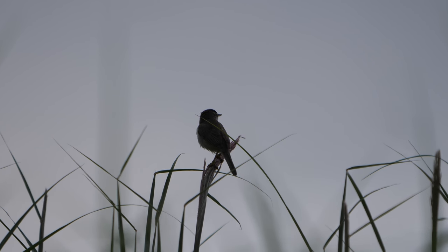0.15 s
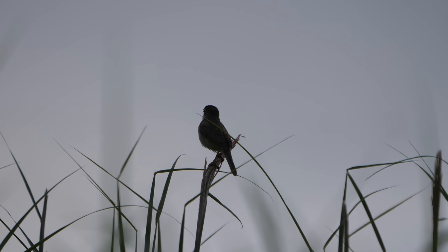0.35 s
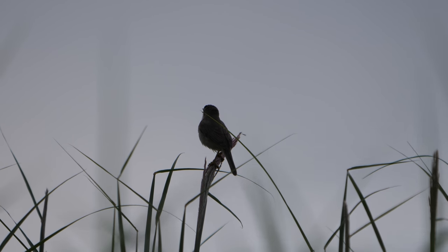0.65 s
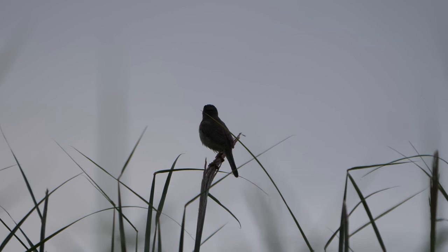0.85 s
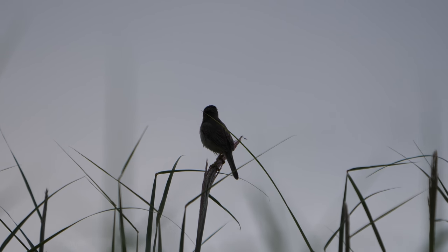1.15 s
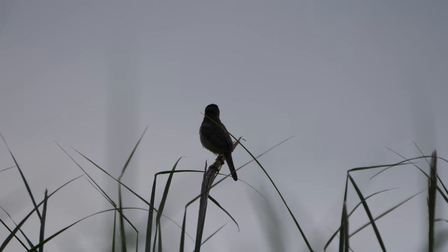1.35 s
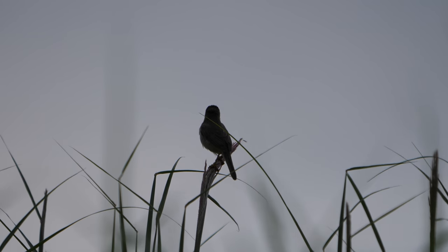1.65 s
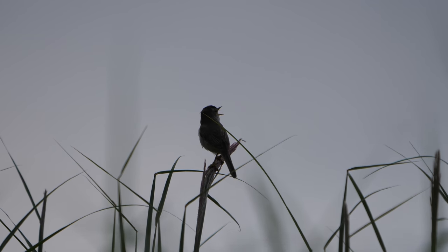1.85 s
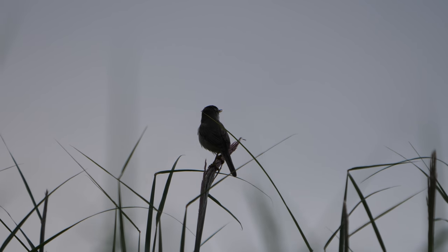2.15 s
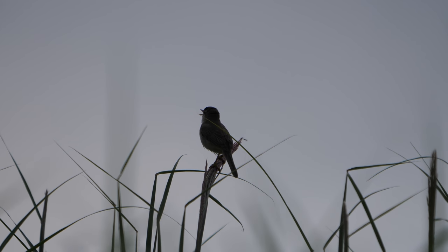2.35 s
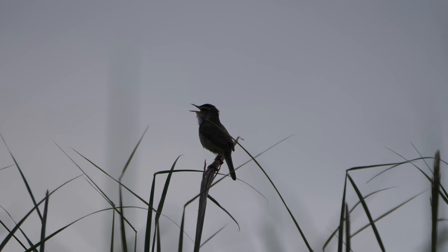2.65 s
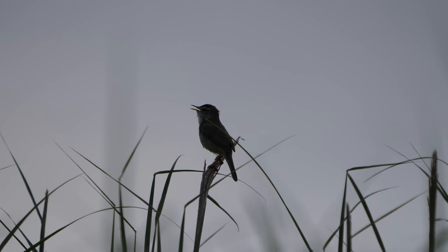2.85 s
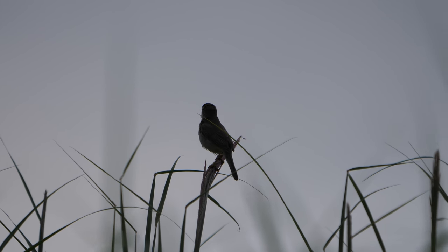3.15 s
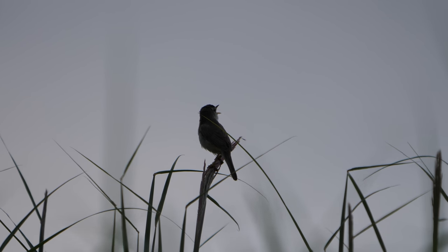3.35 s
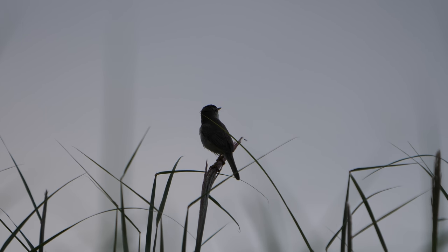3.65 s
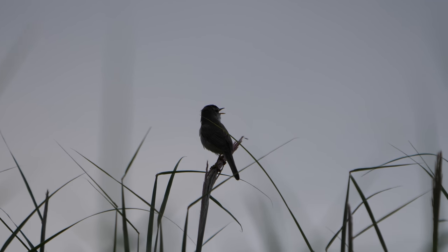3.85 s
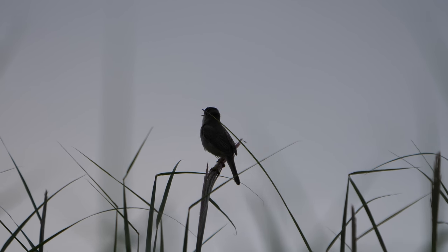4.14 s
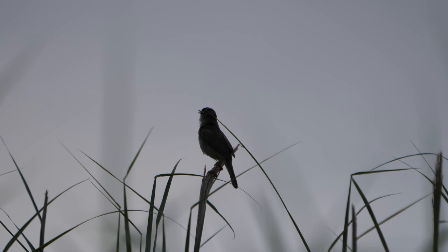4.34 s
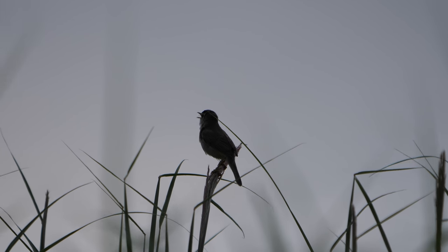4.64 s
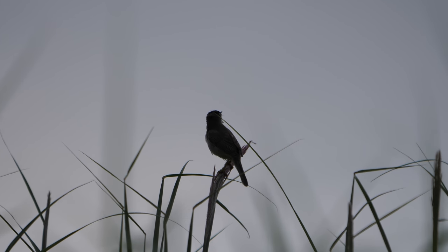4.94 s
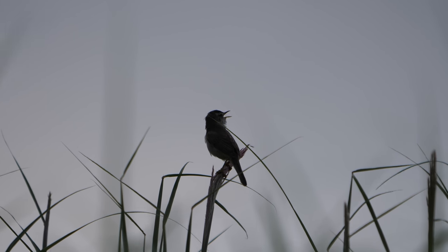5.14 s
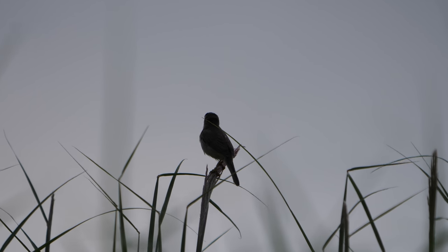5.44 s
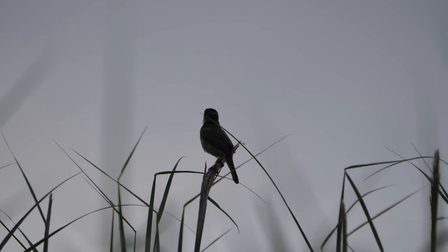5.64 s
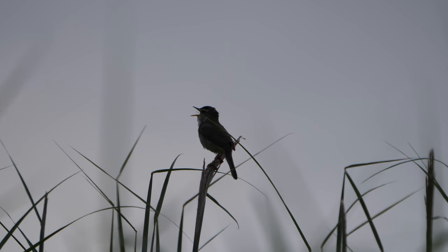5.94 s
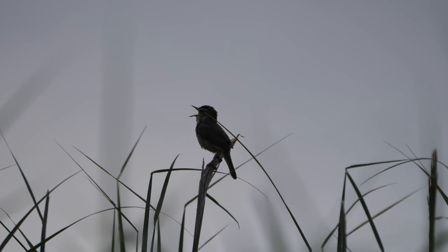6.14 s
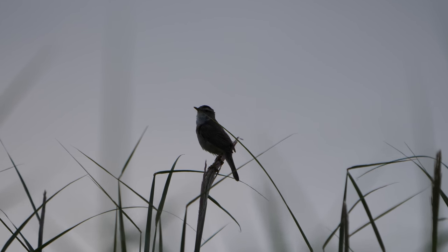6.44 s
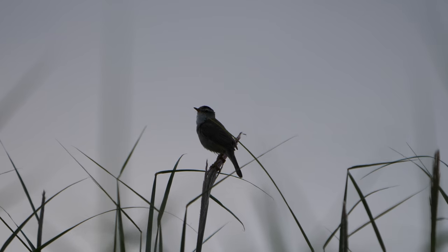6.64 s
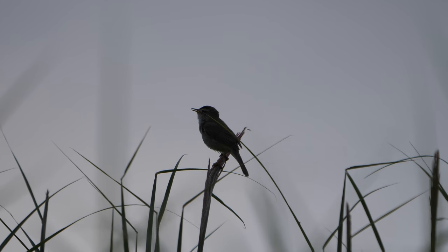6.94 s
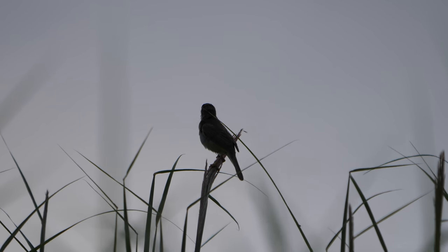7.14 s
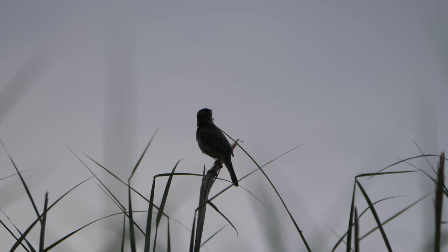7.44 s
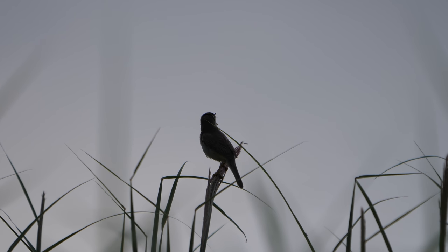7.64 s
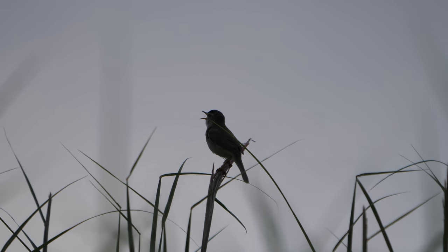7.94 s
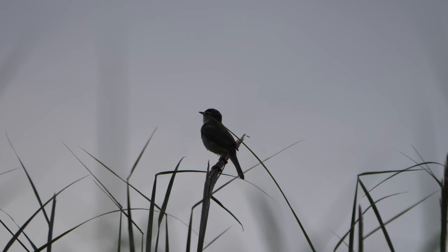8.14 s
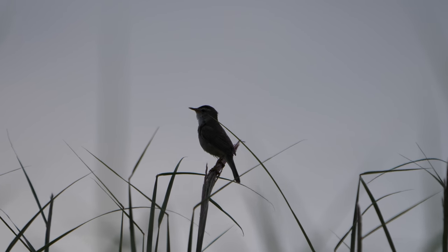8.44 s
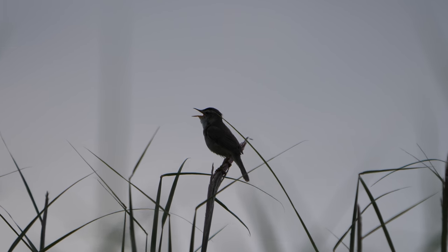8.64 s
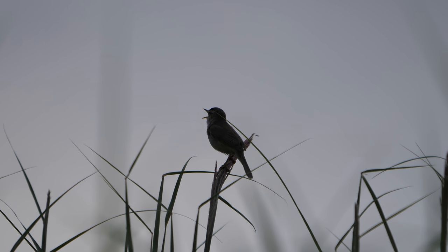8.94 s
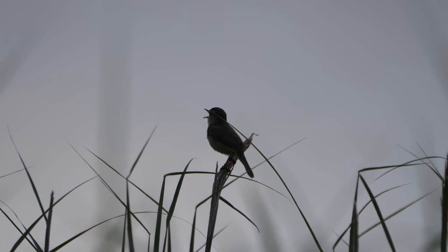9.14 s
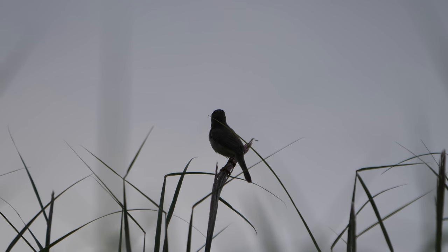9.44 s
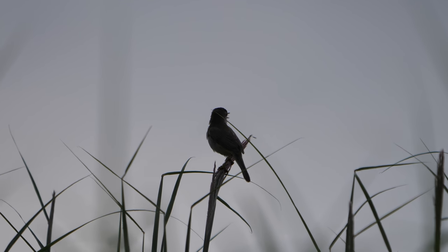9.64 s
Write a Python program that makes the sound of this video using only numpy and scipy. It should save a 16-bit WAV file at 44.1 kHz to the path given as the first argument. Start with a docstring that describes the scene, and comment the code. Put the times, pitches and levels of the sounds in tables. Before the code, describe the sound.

Outdoors, one warbler pours out quick repeated scratchy and sweet notes, starting thin and sparse, then growing loud and busy over quiet distant hum.

```python
"""A reed warbler sings from a stem a few metres away: chips, buzzy rasps, slurred whistles, trills and churrs.
Its notes are pitch gestures of the syrinx (the bird's voice organ); rasps are coloured by the throat.
The reed bed returns a short scattered echo, and a farther bird adds two faint slurs.
A faint insect, a narrow band of noise, buzzes on and off over a low far-off hum and an airy hiss."""
import sys
import numpy as np
from scipy import signal
from scipy.fft import rfft, irfft
from scipy.io import wavfile
from scipy.ndimage import uniform_filter1d, map_coordinates

SR = 44100
rng = np.random.default_rng(int(sys.argv[2]) if len(sys.argv) > 2 else 0)


def to_wav(s):
    """Save 16-bit WAV."""
    ch = np.atleast_2d(s).T  # columns
    pcm = np.round(np.clip(ch, -1, 1) * 32767)  # PCM
    wavfile.write(sys.argv[1], SR, pcm.astype(np.int16))


N = 431738  # length of the scene in samples


def undb(db):
    """Turn decibels into a gain."""
    return 10 ** (np.asarray(db) / 20)


def unit(x):
    """Scale to an rms (average strength) of 1."""
    return x / np.sqrt(np.mean(x ** 2) + 1e-18)


def add(out, start, sound):
    """Mix a sound in at a time in seconds."""
    i = max(int(start * SR), 0)
    out[i:i + len(sound)] += sound[:max(len(out) - i, 0)]


def wander(size, hz):
    """A smooth random curve with a spread near 1, through hz random points a second."""
    at = np.arange(size) * hz / SR
    points = rng.standard_normal(int(at[-1]) + 2)
    return map_coordinates(points, [at], order=3, mode="nearest")


def turn(hz):
    """Phase in radians of a vibration with moving pitch."""
    return 2 * np.pi * np.cumsum(hz) / SR


def fade(size, seconds):
    """Soft opening and closing."""
    i = np.arange(size)
    nearest_end = np.minimum(i, i[::-1])
    return np.sin(np.pi / 2 * np.minimum(nearest_end / (seconds * SR), 1)) ** 2


def gesture(length, pitches, crest):
    """One push of air: pitch bends through three points while the level swells to its crest and dies."""
    u = np.linspace(0, 1, int(length * SR))
    hz = np.polyval(np.polyfit([0, .5, 1], pitches, 2), u)
    progress = np.interp(u, [0, np.clip(crest, .1, .9), 1], [0, .5, 1])
    swell = np.sin(np.pi * progress).clip(0) ** .7
    return hz, swell


def tone(hz, octave_db, waver):
    """A nearly pure, unsteady voice; its octave escapes the throat only while the pitch is low."""
    phase = turn(hz * (1 + waver * wander(len(hz), 495.5)))
    octave = undb(octave_db) / (1 + (hz / 2900) ** 10) * np.sin(2 * phase)
    return np.sin(phase) + octave


def chip(length, pitches, crest, octave_db=-15, waver=0.031):
    """A quick, nearly pure sweep up, down or over an arch."""
    hz, swell = gesture(length, pitches, crest)
    return swell * tone(hz, octave_db, waver)


def reedy(hz, phase, throat_hz, width_hz, leak_db=-25, count=7):
    """Harmonics pass through the throat's band; a little of the fundamental leaks out when it is high."""
    k = np.arange(1, count + 1)[:, None]
    throat = 1 / (1 + ((k * hz - throat_hz) / width_hz) ** 4)
    throat[0] = (throat[0] + undb(leak_db)) / (1 + (1500 / hz) ** 10)
    strength = np.sqrt((throat ** 2).sum(0).mean())
    return (throat * np.sin(k * phase)).sum(0) / strength


def rasp(length, pitches, crest, throat_hz, width_hz, rough, beat_hz=650, beat_depth=1.15, jitter=.075):
    """A tick or scrape heard by its overtones: the other side of the syrinx shakes the pitch harshly."""
    hz, swell = gesture(length, pitches, crest)
    beat = turn(beat_hz * (1 + 0.14 * wander(len(hz), 300)))
    shake = np.sin(beat + rng.uniform(0, 2 * np.pi))
    unsteady_hz = hz * (1 + jitter * rough * wander(len(hz), 1500))
    phase = turn(unsteady_hz) + beat_depth * rough * shake
    return swell * (1 + rough * wander(len(hz), 515)) * reedy(hz, phase, throat_hz, width_hz)


def slur(hz, db, octave_db, waver, quiver_hz=190, quiver=0.0098, quiver_db=2.0):
    """A long whistle; a quiver of air pressure moves pitch and level together."""
    pressure = wander(len(hz), quiver_hz)
    pitch = uniform_filter1d(hz, size=200) * (1 + quiver * pressure)  # corners rounded first
    loud = undb(db + quiver_db * pressure) * fade(len(hz), .002)
    return loud * tone(pitch, octave_db, waver)


def whistles(onset_rough=0.022, settle_s=0.043, calm=0.0095, tick_lead_s=.011, tick_db=-19):
    """High whistles drop and hold; arched ones start with a tick, flutter, then settle as they fall."""
    # Each row: start in seconds, length in seconds, level in dB, pitch ratio.
    high_whistles = [(2.594, 0.082, -25, .99), (2.727, 0.084, -26.5, 1.016), (2.856, 0.088, -26, 1.005)]
    # The course they share. Each row: share of the length, pitch in Hz, level in dB;
    # a whistle's own ratio and level are added to it.
    high_course = [(0, 5600, -14), (.05, 5210, 0), (.19, 3800, -8.5), (.4, 3920, -4.5), (.58, 3788, 0),
                   (.72, 4000, 1), (0.851, 4155, -2), (1, 3740, -3)]
    # Each row: loudest moment in seconds, seconds sung before it, seconds after it, level in dB, pitch ratio.
    arched_whistles = [(4.421, 0.074, 0.046, -18.5, 0.996), (4.847, 0.098, 0.039, -18.5, 1.01),
                       (5.277, 0.0813, .05, -18.5, 0.988), (5.705, 0.076, 0.064, -19.5, 0.98)]
    # The course they share. Each row: seconds from the loudest moment, pitch in Hz before the ratio,
    # level in dB relative to the whistle.
    arched_course = [(-.096, 3010, -12), (-.066, 3264, -9.5), (-.043, 3434, -4.5), (-.018, 3370, -5.5),
                     (0, 3020, 0), (.018, 2700, -8), (0.041, 2440, -12.5), (.058, 2396, -18)]
    out = np.zeros(N)
    share, course_hz, course_db = np.transpose(high_course)
    for start, length, db, ratio in high_whistles:
        u = np.linspace(0, 1, int(length * SR))
        hz = ratio * np.interp(u, share, course_hz)
        level_db = db + np.interp(u, share, course_db)
        add(out, start, slur(hz, level_db, octave_db=-18, waver=0.015))

    s, course_hz, course_db = np.transpose(arched_course)
    for loudest, before, after, db, ratio in arched_whistles:
        t = np.arange(-before - .002, after + .002, 1 / SR)  # 2 ms more at each end for the fades
        flutter = calm + onset_rough * np.exp(-(t - t[0]) / settle_s)
        hz = ratio * np.interp(t, s, course_hz)
        level_db = db + np.interp(t, s, course_db)
        add(out, loudest + t[0], slur(hz, level_db, octave_db=-37, waver=flutter))
        tick = chip(0.0034, (2750, 2900, 2870), 0.66)
        add(out, loudest - before - tick_lead_s, undb(db + tick_db) * tick)
    return out


def warbles(rest_hz=2230, rise_s=.007, fall_s=.0034, gap_s=.0188):
    """A reedy upstroke, then four arches, slow up and quick down, over a hoarse falling second voice."""
    # Each row: seconds at the top of the first arch, level in dB, pitch ratio.
    runs = [(7.8383, -20.5, 1.04), (7.9627, -20, 1), (8.085, -20.5, 1.01)]
    # The four arches of a run. Each row: top pitch in Hz before the ratio, level in dB relative to the run.
    run_arches = [(3620, -4.5), (3785, 1.5), (3480, 2), (3140, -2.7)]
    out = np.zeros(N)
    t = np.arange(-2 * rise_s, 2 * fall_s, 1 / SR)
    arch = np.exp(-(t / np.where(t < 0, rise_s, fall_s)) ** 2)
    for first, db, ratio in runs:
        upstroke = rasp(0.01265, (2120, 2530, 3400), 0.76, throat_hz=3860, width_hz=1000, rough=0.17)
        add(out, first - .016, undb(db - 12.5) * upstroke)
        second_voice = chip(0.054, (3900, 3350, 2950), 0.42, octave_db=-30, waver=0.106)
        add(out, first, undb(db - 15) * second_voice)
        for k, (top_hz, arch_db) in enumerate(run_arches):
            hz = rest_hz + (ratio * top_hz - rest_hz) * arch
            voice = tone(hz, octave_db=-27, waver=.03)
            loud = undb(db + arch_db) * beak(hz, centre_hz=3000, width_hz=250)
            loud = loud * np.sqrt(arch) * fade(len(t), 0.0012)
            add(out, first + k * gap_s + t[0], loud * voice)
    return out


def beak(hz, centre_hz, width_hz):
    """Gain of the open beak's resonance: a gliding note flares as it passes through."""
    return 1 / np.sqrt(1 + ((hz - centre_hz) / width_hz) ** 2)


def churrs(rest_hz=1920, upper_hz=3150, upper_rise_hz=800, rise_s=.0048, fall_s=.003, loud_s=.0028,
           rough=.04, grate_db=-2):
    """A low voice flicks up some 35 times a second, an upper one climbs between flicks, and they grate."""
    # Each row: first flick, last flick and end in seconds, then levels in dB: first flick, second flick,
    # third flick, last flick, low voice, upper voice.
    churr_calls = [(0.3, 0.4534, .476, -37.5, -46, -51, -42.5, -51.5, -66.5),
                   (1.432, 1.624, 1.638, -29.5, -30.5, -40, -33, -47, -50.5),
                   (3.127, 3.29, 3.316, -21, -29, -32.5, -23, -44, -43.5),
                   (6.3444, 6.507, 6.518, -21, -23, -29, -35.5, -42.5, -47.5),
                   (7.1148, 7.2545, 7.266, -25.5, -24.5, -33.5, -37.5, -45.5, -45.5),
                   (8.323, 8.46, 8.478, -25, -31.5, -33, -29.5, -44.5, -51)]
    out = np.zeros(N)
    for first, last, end, *flick_db, low_db, upper_db in churr_calls:
        start = first - .01
        t = np.arange(start, end, 1 / SR)
        s, top_hz, db = flicks(first, last, *flick_db)
        lag = t[:, None] - s  # time from every flick
        flick = np.exp(-(lag / np.where(lag < 0, rise_s, fall_s)) ** 2)
        between = 1 - flick.max(1)

        pitch = rest_hz + flick @ (top_hz - rest_hz)
        pitch = pitch * (1 + rough * between * wander(len(t), 900))
        murmur = undb(low_db) * between * np.abs(wander(len(t), 161.6))
        bursts = np.exp(-(lag / loud_s) ** 2) @ undb(db)
        low = tone(pitch, -30, 0.013) * (murmur + bursts)

        # the climb starts again at every flick
        climb = np.interp(t, [start, *s, end], np.arange(len(s) + 2)) % 1
        upper = tone(upper_hz + upper_rise_hz * climb, -30, .035)
        upper = upper * undb(upper_db + 3.5 * wander(len(t), 170))
        grate = wander(len(t), 900) * np.sin(turn(np.full(len(t), 2750)))
        grate = grate * undb(low_db + grate_db)
        add(out, start, (low + between * (upper + grate)) * fade(len(t), 0.0024))
        lead_in = chip(0.018, (3150, 3750, 4300), 0.27)
        add(out, first - .019, undb(upper_db + 4.0) * lead_in)
    return out


def flicks(first, last, first_db, second_db, third_db, last_db, first_gap_s=.0195, beat_s=.029,
           scatter_db=1.5):
    """A full flick, a quick second, then an even beat; after the first, weaker flicks reach less high."""
    # How high a flick reaches for its strength. Each row: level in dB, top pitch in Hz.
    flick_reach = [(-50.5, 2100), (-35.5, 2380), (-22, 3020)]
    count = round((last - first - first_gap_s) / beat_s)
    later_db = np.linspace(third_db, last_db, count) + scatter_db * rng.standard_normal(count)
    db = np.r_[first_db, second_db, later_db]
    effort_db, reach_hz = np.transpose(flick_reach)
    top_hz = np.r_[reach_hz[-1], np.interp(db[1:], effort_db, reach_hz)]
    times = np.r_[first, np.linspace(first + first_gap_s, last, count + 1)]
    return times, top_hz, db


def trills(shake_hz=155, depth=0.1, dip_db=7.5, lead_s=0.0052, lead_db=-10.5):
    """A reedy upstroke leads into a high arch with fast vibrato; the voice thins at the top of each shake."""
    # Each row: start in seconds, length in seconds, reference pitch in Hz, level in dB.
    trill_notes = [(4.545, 0.036, 6910, -26), (4.626, 0.041, 6640, -26.5), (4.981, 0.043, 6660, -27.5),
                   (5.06, 0.039, 6640, -25.5), (5.41, 0.037, 6900, -26), (5.488, 0.034, 7100, -23.5)]
    # The arch they share, before vibrato and dips. Each row: share of the length,
    # pitch as a ratio to the reference, level in dB relative to the note.
    trill_arch = [(0, 0.23, -18), (0.148, 0.9, 0.5), (0.301, 0.96, -9), (.6, 0.95, -1), (.78, .83, -2.5),
                  (.87, 0.59, -16), (1, 0.31, -25.5)]
    out = np.zeros(N)
    share, ratio, arch_db = np.transpose(trill_arch)
    for start, length, top_hz, db in trill_notes:
        u = np.linspace(0, 1, int(length * SR))
        middle = np.sin(np.pi * u) ** 2  # vibrato is strongest mid-note
        shake = np.cos(2 * np.pi * shake_hz * (u - .31) * length) * middle
        hz = top_hz * np.interp(u, share, ratio) * (1 + depth * shake)
        loud = undb(db + np.interp(u, share, arch_db) - dip_db * (shake + middle))
        add(out, start, loud * fade(len(u), 0.0015) * tone(hz, -14, 0.023))
        upstroke = rasp(0.008, (1340, 1980, 3260), .9, throat_hz=4840, width_hz=2030, rough=0.12)
        add(out, start - lead_s, undb(db + lead_db) * upstroke)
    return out


def zweeps(crest=.6, shake_depth=.9, unsteady=.25, waver=.016, tip_lead_s=.012, tip_s=.02, other_share=.19):
    """A climbing voice is shaken by another at a fifth of its pitch, making it reedy; a pure tip ends it."""
    # Each row: start in seconds, length in seconds, start pitch in Hz, end pitch in Hz,
    # level in dB, level of the tip in dB.
    rising_notes = [(5.89, .043, 3000, 4400, -27.5, -32), (6.052, 0.042, 3100, 4600, -27.5, -31),
                    (6.225, .036, 3250, 4750, -28.5, -31.5), (7.391, .037, 3150, 4460, -30.5, -27.5),
                    (7.543, .043, 3300, 4500, -30, -28.5), (7.716, 0.038, 3300, 4550, -30, -28)]
    # Pitch of the tip in Hz at its start, middle and end.
    tip_hz = (3846, 4925, 4570)
    out = np.zeros(N)
    for start, length, low_hz, high_hz, db, tip_db in rising_notes:
        hz, swell = gesture(length, [low_hz, (low_hz + high_hz) / 2, high_hz], crest)
        other = np.sin(turn(hz * other_share * (1 + .05 * wander(len(hz), 600))))
        climbing = turn(hz * (1 + waver * wander(len(hz), 1417)))
        phase = climbing + shake_depth * (1 + unsteady * wander(len(hz), 430)) * other
        loud = undb(db) * swell * (1 + 0.13 * wander(len(hz), 870))
        add(out, start, loud * np.sin(phase))
        add(out, start + length - tip_lead_s, undb(tip_db) * chip(tip_s, tip_hz, 0.19))
    return out


def shivers(pulse_hz=140, bend=0.05, undertone_db=-24):
    """Falling notes in pulses; alternate cycles differ, adding lines at half and 1.5 times the pitch."""
    # Each row: start in seconds, length in seconds, start pitch in Hz, end pitch in Hz, level in dB.
    shiver_notes = [(8.9013, 0.031, 3450, 2870, -25.5), (8.949, .026, 3280, 2690, -25.5),
                    (9.724, 0.032, 3520, 3050, -24), (9.77, 0.047, 3425, 2840, -22)]
    out = np.zeros(N)
    for start, length, high_hz, low_hz, db in shiver_notes:
        hz, swell = gesture(length, [high_hz, (high_hz + low_hz) / 2, low_hz], 0.24)
        pulse = turn(np.full(len(hz), pulse_hz))
        phase = turn(hz * (1 + bend * np.sin(pulse) + 0.035 * wander(len(hz), 880)))
        voice = np.sin(phase) * (1 + 2 * undb(undertone_db) * np.cos(phase / 2))
        loud = undb(db) * np.sqrt(swell) * np.abs(np.sin(pulse / 2)) ** 0.79
        add(out, start, loud * voice)
    return out


def repeat(calls, strokes, voice):
    """Sing one learnt syllable again and again, each time at its own level and pitch."""
    out = np.zeros(N)
    for start, db, ratio in calls:
        for after, length, first_hz, middle_hz, last_hz, stroke_db, *colour in strokes:
            pitches = ratio * np.array([first_hz, middle_hz, last_hz])
            add(out, start + after, undb(db + stroke_db) * voice(length, pitches, *colour))
    return out


def pure_calls():
    """Nearly pure sweeps of the syrinx: thin falling tsips, dry tiks, and flourishes of a rise and flicks."""
    # Tiks, then flourishes. Each row: start in seconds, level in dB, pitch ratio.
    tiks = [(.9598, -30, 1.006), (1.104, -29, 1.026), (1.2221, -28.5, 0.99), (2.1498, -28, 1.03),
            (2.292, -26, 0.98)]
    flourishes = [(1.7268, -31.5, 1.06), (1.8837, -31, 1.02), (3.385, -25.5, 0.99), (3.557, -26.5, 1)]
    # Their strokes. Each row: seconds after the call's start, length in seconds, start, middle and end pitch
    # in Hz before the ratio, level in dB relative to the call, loudest point from 0 to 1.
    tik_strokes = [(0, .0053, 2660, 3320, 4600, -5, 0.63), (.0047, .0044, 2030, 3010, 3880, 0, 0.74),
                   (0.0225, .0047, 3520, 2990, 2700, -5, 0.5)]
    flourish_strokes = [(0, .018, 2390, 4890, 6300, -3, 0.78), (.04, 0.0094, 4500, 5110, 6470, -2, 0.32),
                        (0.059, 0.021, 3670, 4800, 4900, -1, .38),
                        (.0818, .018, 3570, 4110, 4500, -1.5, 0.42)]
    # Each row: start in seconds, length in seconds, level in dB, loudest point from 0 to 1.
    tsips = [(0.026, 0.023, -42, 0.7), (0.078, 0.023, -37.5, 0.5), (.607, 0.021, -38.5, 0.53),
             (0.659, .019, -29, 0.83), (0.771, 0.02, -32, 0.73), (.821, 0.026, -29.5, 0.54),
             (2.4495, 0.023, -29.5, 0.55), (2.4987, 0.027, -25.5, 0.8)]
    # Pitch of a tsip in Hz at its start, middle and end.
    tsip_hz = (4540, 3700, 3235)
    out = repeat(tiks, tik_strokes, chip) + repeat(flourishes, flourish_strokes, chip)
    for start, length, db, crest in tsips:
        add(out, start, undb(db) * chip(length, tsip_hz, crest, octave_db=-30, waver=0.023))
    return out


def harsh_calls():
    """Rough sweeps filtered by the throat: nasal chirrups, short scrapes, double tchacks, creaky rattles."""
    # The calls of each kind. Each row: start in seconds, level in dB, pitch ratio.
    chirrups = [(3.825, -30, .975), (3.9578, -29, 0.99), (4.087, -28, 1), (4.2117, -29.5, 1.01)]
    scrapes = [(8.5934, -34, 0.99), (8.652, -32, 1.03), (8.7165, -33, 1.01), (8.7812, -32, 1.04)]
    tchacks = [(6.624, -29, 1), (6.8, -30.5, 0.99), (6.9416, -30.5, 1.01)]
    rattles = [(5.8315, -28, 1.1), (5.9865, -27.5, 1.08), (6.154, -29, 1.02), (7.3312, -31.5, .97),
               (7.4755, -29, 1.05), (7.6508, -30, 0.9)]  # three falling ticks and a creak before each rising note
    # Their strokes. Each row: seconds after the call's start, length in seconds, start, middle and end pitch
    # in Hz before the ratio, level in dB relative to the call, loudest point from 0 to 1 (kept to 0.1-0.9),
    # throat centre in Hz, throat half-width in Hz, roughness from 0 to 1.
    chirrup_strokes = [(0, 0.0151, 1840, 2885, 3810, -2, 1, 4090, 1200, 0.35),
                       (.006, 0.0314, 1506, 1760, 1846, -0.5, 0.9, 3830, 840, 0.12)]
    scrape_strokes = [(.001, .017, 1885, 2685, 3150, -2.7, .58, 4240, 1530, 0.33),
                      (.007, 0.015, 1544, 1645, 1590, -1.5, 0.19, 4330, 1300, 0.19)]
    tchack_strokes = [(0, 0.01, 1730, 1556, 1030, -1, 0.51, 3880, 1750, .09),
                      (0.04, 0.013, 1640, 1515, 1010, 0, .1, 3830, 1540, .05)]
    rattle_strokes = [(0, 0.0078, 3400, 2970, 1770, -3, 0.76, 4120, 1540, 0.099),
                      (.015, .0105, 4090, 2746, 1480, -1.5, 0.55, 4120, 1460, 0.12),
                      (0.03, .0069, 3500, 2500, 1600, -5.5, .38, 3970, 1220, .02),
                      (.039, 0.042, 1720, 1750, 1860, -11.5, 0.32, 3970, 1140, 0.31)]
    return (repeat(chirrups, chirrup_strokes, rasp) + repeat(scrapes, scrape_strokes, rasp)
            + repeat(tchacks, tchack_strokes, rasp) + repeat(rattles, rattle_strokes, rasp))


def chatters(gap_s=.0216, first_s=0.0097, later_s=0.0131, throat_hz=4270, sink_hz=110, width_hz=1300,
             narrow_hz=55, rough=0.34, smoothing=0.043, count=4):
    """Runs of falling rasps; with each one the throat sinks and narrows and the voice gets smoother."""
    # Each row: start in seconds, level in dB.
    chatter_runs = [(9.0268, -32.5), (9.152, -32), (9.2795, -30.5), (9.414, -31), (9.5354, -32.5)]
    # Pitch of each rasp in Hz at its start, middle and end.
    chatter_hz = (1873, 1527, 1330)
    out = np.zeros(N)
    for start, db in chatter_runs:
        for k in range(count):
            length = later_s if k else first_s
            note = rasp(length, chatter_hz, 0.44, throat_hz - k * sink_hz,
                        width_hz - k * narrow_hz, rough - k * smoothing)
            add(out, start + k * gap_s, undb(db) * note)
    return out


def stutters(tick_s=.005, width_hz=1200, rough=.26, count=5):
    """Very fast throat-coloured ticks that swell or fade, leading into the shivering notes."""
    # Each row: start in seconds, seconds between ticks, level of the first tick in dB,
    # level of the last tick in dB, throat centre in Hz.
    stutter_runs = [(8.8497, .0083, -31, -36.5, 4130), (9.6719, .0075, -35, -31, 4400)]
    # Pitch of each tick in Hz at its start, middle and end.
    stutter_hz = (1750, 1640, 1430)
    out = np.zeros(N)
    for start, gap, first_db, last_db, throat_hz in stutter_runs:
        for k, db in enumerate(np.linspace(first_db, last_db, count)):
            tick = rasp(tick_s, stutter_hz, .55, throat_hz, width_hz, rough)
            add(out, start + k * gap, undb(db) * tick)
    return out


def far_bird():
    """Two faint falling slurs, quick pitch sweeps from deeper in the reeds."""
    # Each row: start in seconds, length in seconds, start, middle and end pitch in Hz, level in dB.
    far_slurs = [(6.269, .038, 3970, 3350, 2750, -46), (6.746, 0.048, 3660, 3180, 3130, -54)]
    out = np.zeros(N)
    for start, length, *pitches, db in far_slurs:
        add(out, start, undb(db) * chip(length, pitches, .2))
    return out


def reed_echo(song, near_db=-19, near_t60=0.2, far_db=-28, far_t60=0.47):
    """The nearest stems return single echoes; countless others scatter a dense tail."""
    t = np.arange(SR // 2) / SR
    build = 1 - np.exp(-(t / .012) ** 2)  # the tail grows in over some 12 ms
    response = np.zeros(len(t))
    for db, t60 in ((near_db, near_t60), (far_db, far_t60)):
        decay = np.exp(-np.log(1000) * t / t60)  # down 60 dB after t60 seconds
        tail = unit(rng.standard_normal(len(t)) * build * decay)
        response += undb(db) * tail / np.sqrt(len(t))
    for delay_s, db in ((.0034, -19), (.0057, -23), (.0122, -23)):
        response[int(delay_s * SR)] += undb(db)
    return signal.fftconvolve(song, response)[:N]


def insect(centre_hz=6100, width_hz=380):
    """A far, narrow buzz that swells and stops: random curves ride on one high pitch."""
    # Each row: start in seconds, end in seconds, level in dB before the swell.
    buzzes = [(0.334, .77, -67.5), (1.617, 2.14, -66.5), (3.038, 3.54, -69), (4.403, 4.87, -68.5),
              (5.862, 6.253, -65), (7.205, 7.7, -66.5), (8.485, 8.977, -68)]
    out = np.zeros(N)
    for start, end, db in buzzes:
        size = int((end - start) * SR)
        phase = turn(np.full(size, centre_hz))
        buzz = wander(size, width_hz) * np.sin(phase) + wander(size, width_hz) * np.cos(phase)
        add(out, start, undb(db) * buzz * fade(size, 0.03) * np.linspace(.6, 1, size))
    return out


def coloured(points):
    """Noise with a spectrum drawn through (Hz, dB) points, scaled to rms 1."""
    hz, db = np.transpose(points)
    bins = np.maximum(np.fft.rfftfreq(N, 1 / SR), 1)
    gain = undb(np.interp(np.log(bins), np.log(hz), db))
    return unit(irfft(rfft(rng.standard_normal(N)) * gain, N))


def background(hum_db=-53.5, air_db=-63):
    """A steady, low far-off hum and an even airy hiss, both shaped noise."""
    # Spectrum shapes of the hum and the hiss. Each row: frequency in Hz, relative level in dB.
    hum_shape = [(20, -17), (45, -12.5), (75, -4.5), (240, -3.5), (290, 0), (345, -7.5), (430, 0.5),
                 (520, -5), (620, -11), (790, -15), (940, -10.5), (1300, -19), (2000, -16), (4000, -45)]
    air_shape = [(500, -14.5), (1400, -7), (1900, 6.5), (3000, 14.5), (4500, 9), (7500, 4), (10000, 4),
                 (12500, 2), (16000, 1.5)]
    return coloured(hum_shape) * undb(hum_db) + coloured(air_shape) * undb(air_db)


def scene():
    """The bird, its echo and the open land around it."""
    song = (pure_calls() + harsh_calls() + chatters() + stutters() + zweeps() + warbles() + shivers()
            + whistles() + trills() + churrs() + far_bird())
    return (song + reed_echo(song) + insect() + background())[None]


def record(dry, top_hz=15800):
    """The recorder cuts the top: a steep low-pass filter."""
    low_pass = signal.ellip(10, .1, 70, top_hz, fs=SR, output="sos")
    return signal.sosfilt(low_pass, dry)


dry = scene()
out = record(dry)
to_wav(out)
```